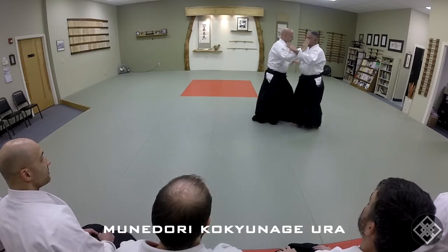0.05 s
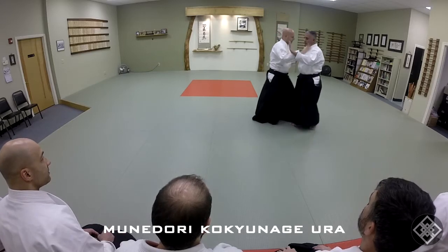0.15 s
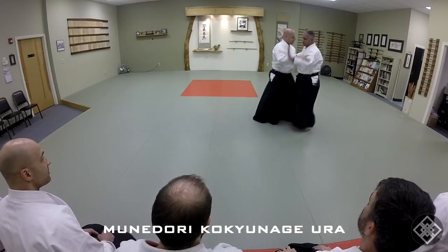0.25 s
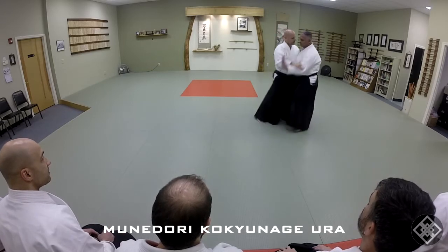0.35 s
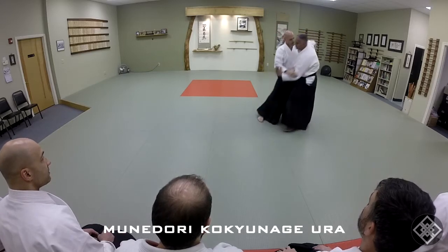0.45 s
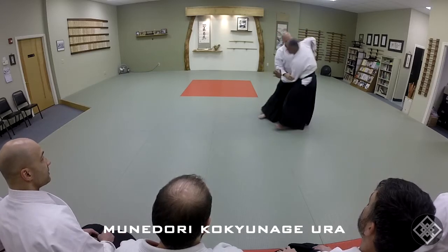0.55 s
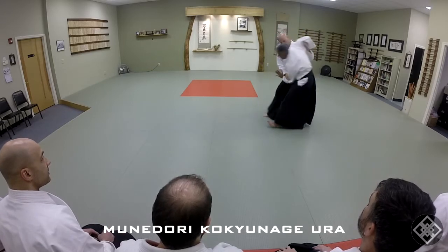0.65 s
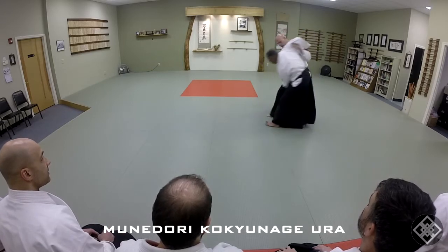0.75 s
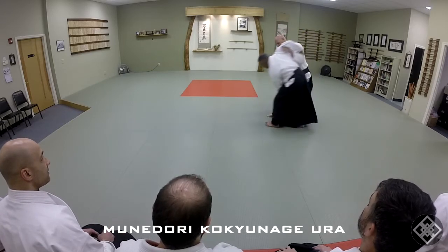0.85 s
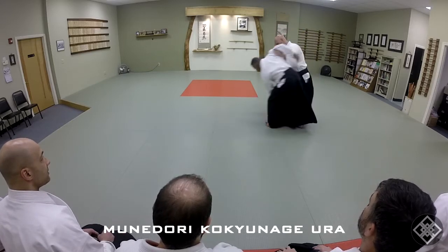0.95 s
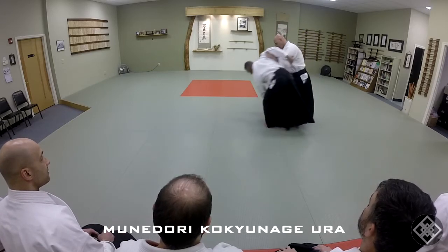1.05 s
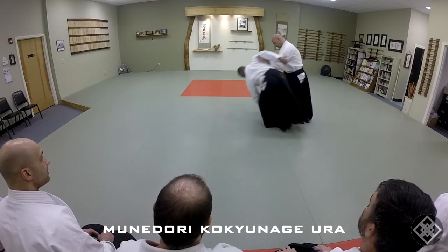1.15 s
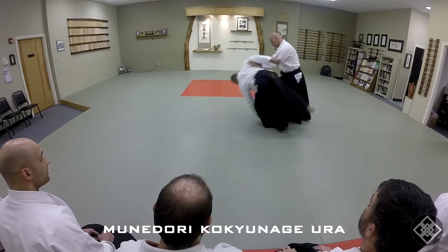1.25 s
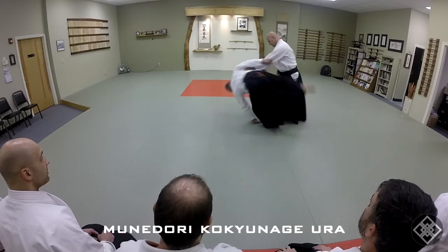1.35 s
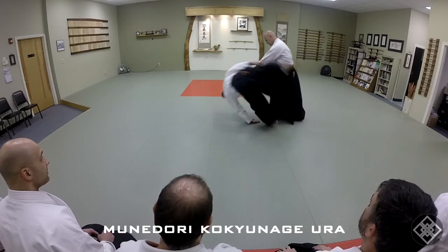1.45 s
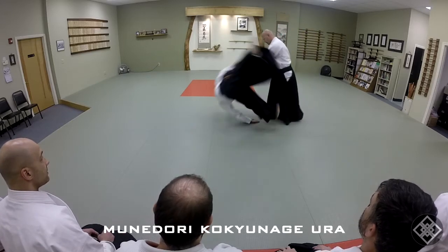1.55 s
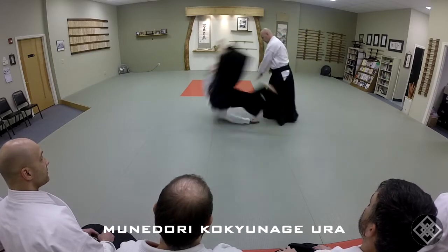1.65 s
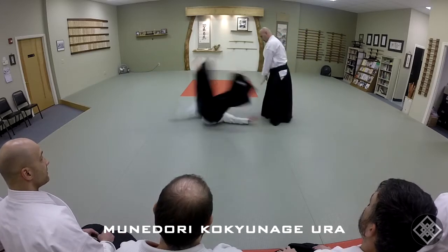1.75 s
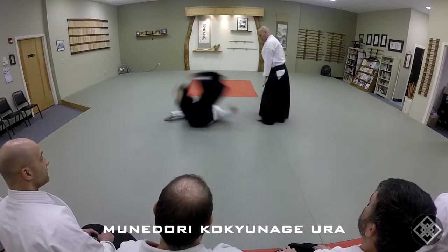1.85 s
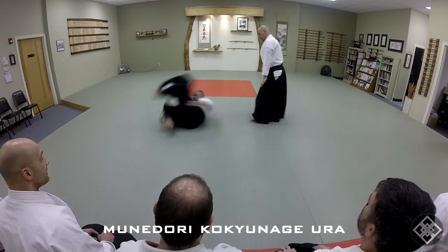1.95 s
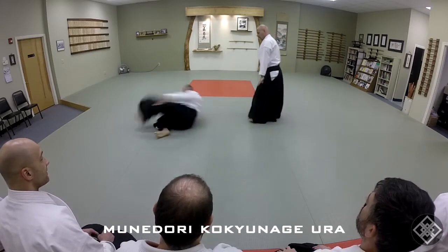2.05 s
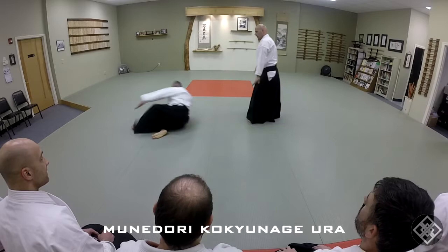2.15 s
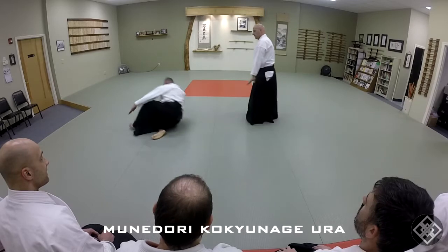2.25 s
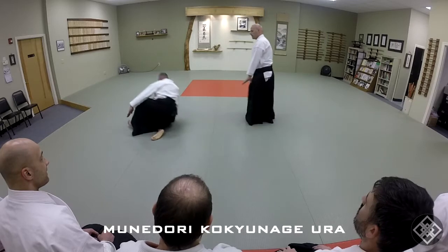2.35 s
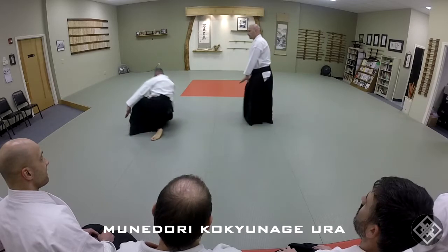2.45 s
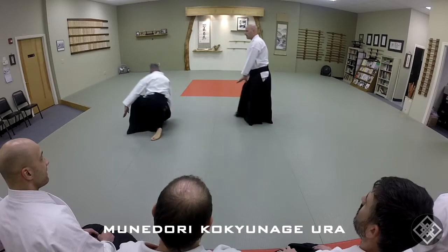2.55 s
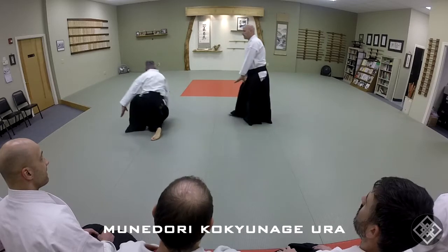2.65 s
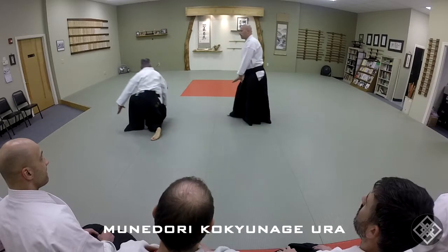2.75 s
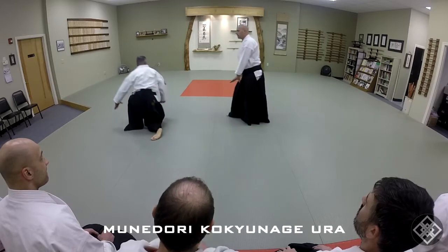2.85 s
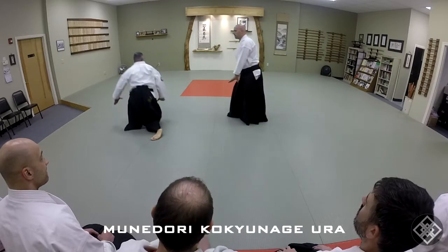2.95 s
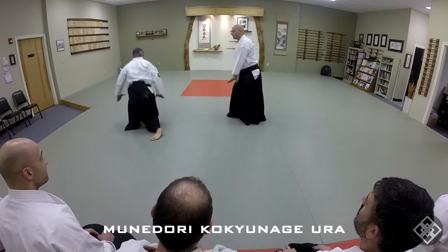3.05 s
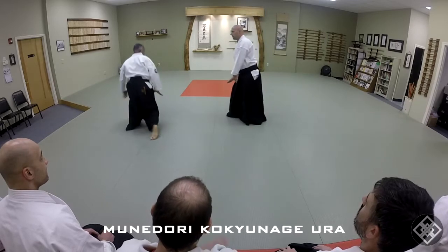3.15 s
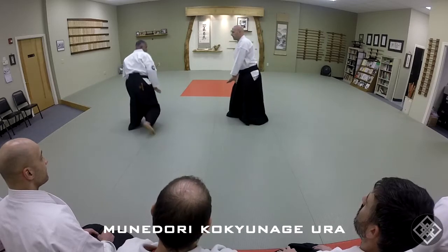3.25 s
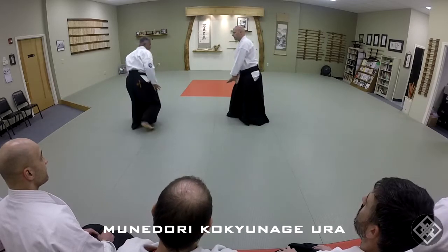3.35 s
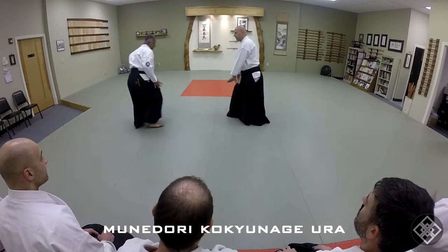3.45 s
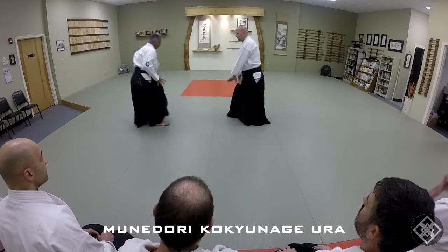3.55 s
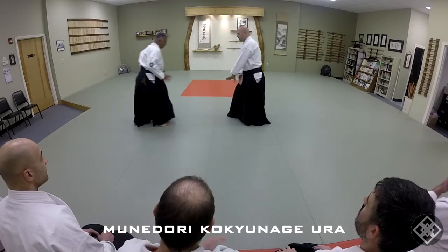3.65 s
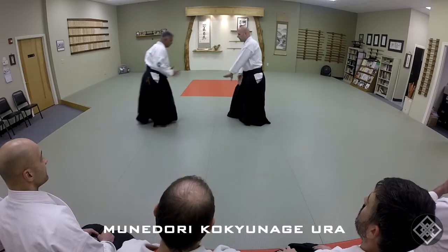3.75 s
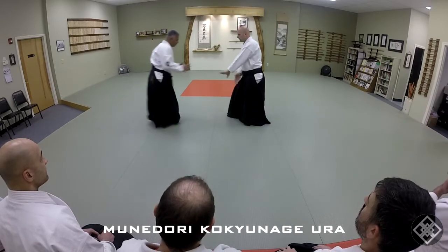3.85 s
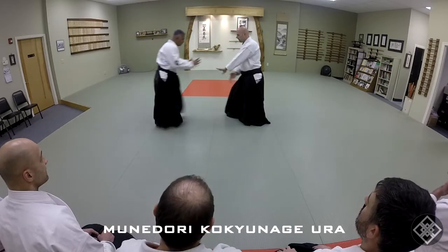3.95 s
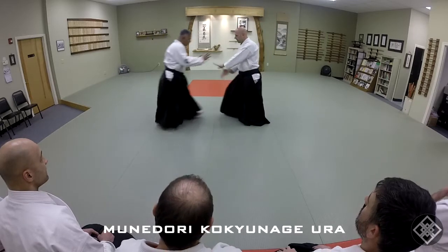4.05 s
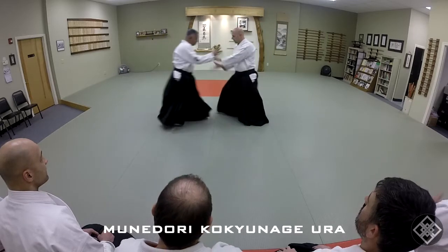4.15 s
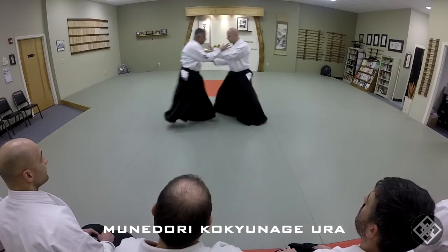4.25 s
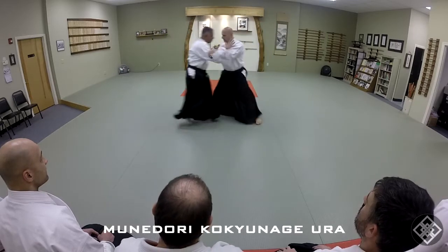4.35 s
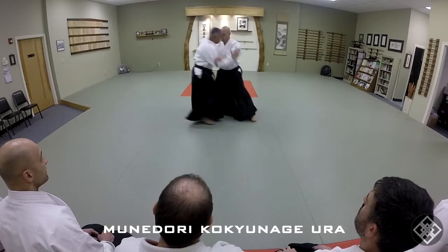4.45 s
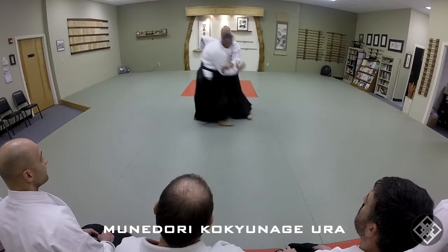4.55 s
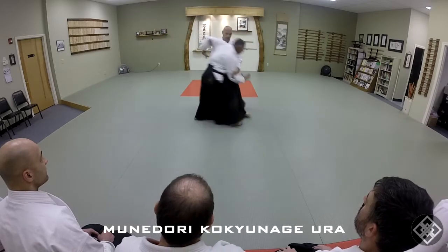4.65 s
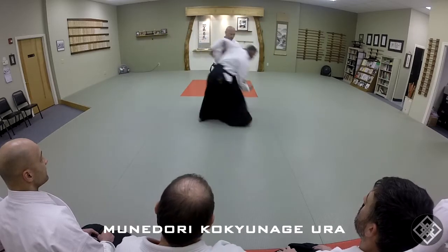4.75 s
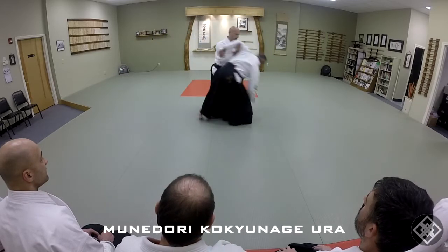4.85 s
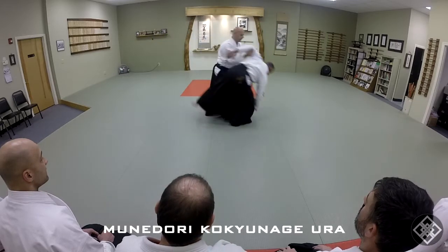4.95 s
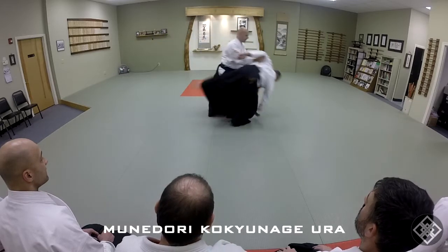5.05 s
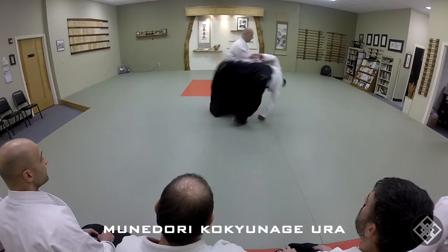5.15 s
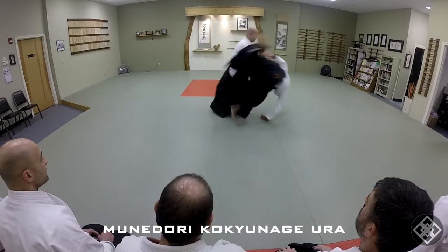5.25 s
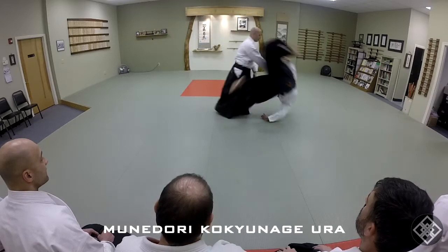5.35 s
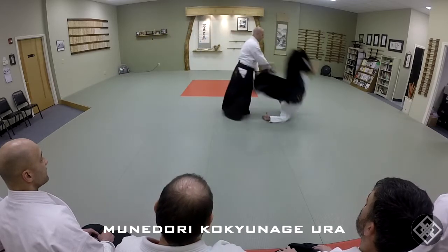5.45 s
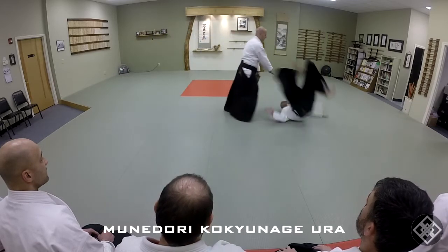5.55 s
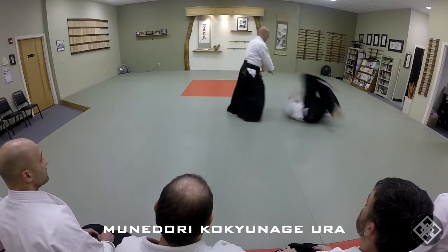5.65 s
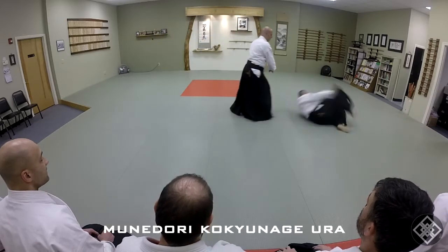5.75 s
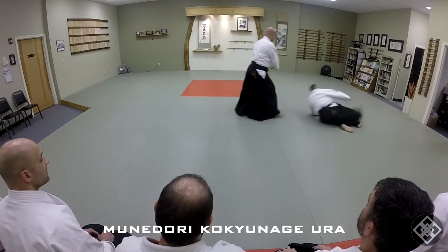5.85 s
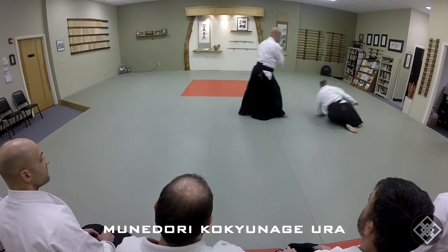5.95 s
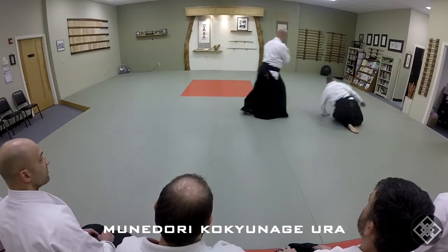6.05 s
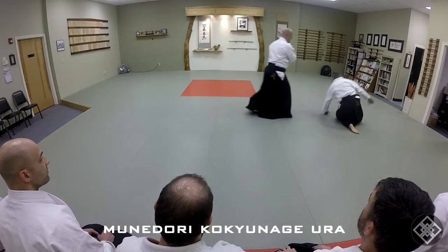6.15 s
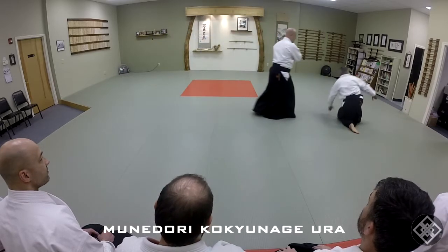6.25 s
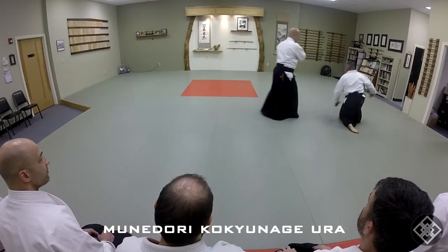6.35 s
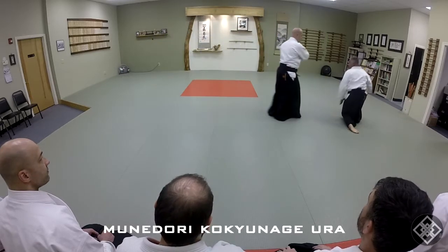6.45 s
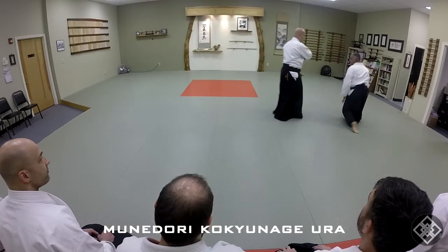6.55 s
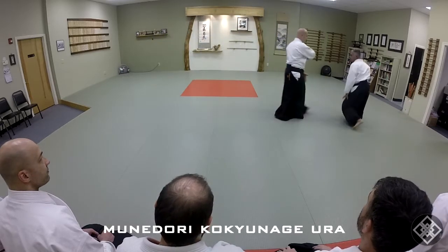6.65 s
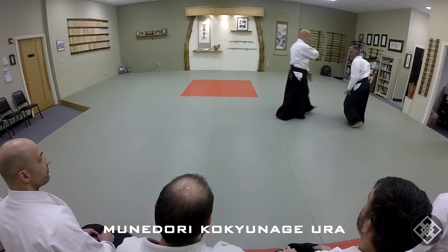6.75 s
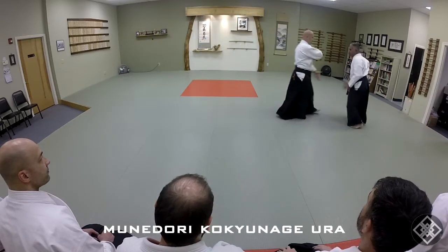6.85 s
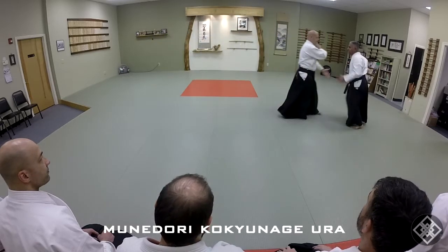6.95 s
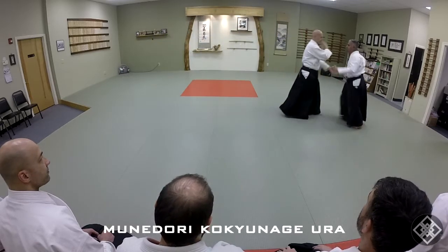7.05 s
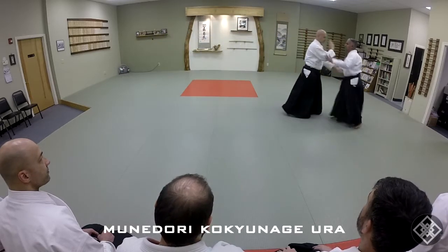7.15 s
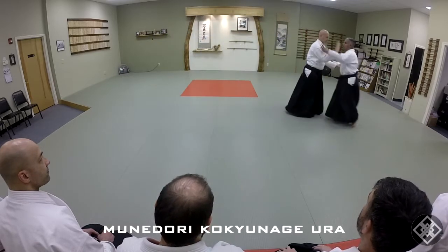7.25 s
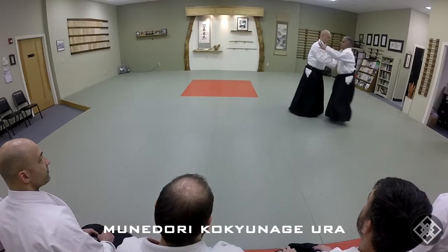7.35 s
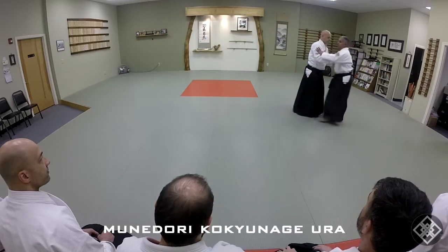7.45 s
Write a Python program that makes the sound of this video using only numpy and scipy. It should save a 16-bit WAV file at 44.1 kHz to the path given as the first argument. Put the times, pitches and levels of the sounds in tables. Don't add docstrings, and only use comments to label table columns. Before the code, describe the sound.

A quiet padded training hall with low ventilation hum. Bare feet scuff and heavy cloth rustles, then a body slams onto the mat with a sharp slap, a thud and a rolling floor rumble. Shuffling, cloth tugs and a light grip follow before a second, boomier fall. Small steps resume. A small camera microphone a few metres away overloads on the slaps and dips in level afterwards.

```python
import sys
import numpy as np
from scipy import signal
from scipy.io import wavfile

SR = 44100
rng = np.random.default_rng(int(sys.argv[2]) if len(sys.argv) > 2 else 0)


def log_audio(samples):
    frames = np.atleast_2d(samples).T
    limited = np.clip(frames, -1, 1)
    pcm = np.round(limited * 32767).astype(np.int16)
    wavfile.write(sys.argv[1], SR, pcm)


def gain_from_db(level_db):
    decades = np.asarray(level_db, float) / 20
    return 10 ** decades


N = 330249

BAND_EDGES = 22 * 2 ** np.arange(0, 10, .5)
# (frequency [Hz], width [Hz], level [dB])
FLOOR_MODES = [
    [(33.7, 10, -1), (61.7, 7, -4), (88.7, 18, -2), (129.7, 9.5, -2)],
    [(35.9, 7.4, -9), (80, 6.7, 2), (104.4, 13.5, -2), (134.3, 13, -4)],
]


def rms_one(x):
    return x / np.sqrt(np.mean(x ** 2) + 1e-20)


def at_hz(points, hz):
    table_hz, value = np.transpose(points)
    return np.interp(np.log(hz), np.log(table_hz), value)


def band(x, low_hz, high_hz):
    edges_hz = [low_hz, min(high_hz, .45 * SR)]
    return signal.sosfilt(signal.butter(2, edges_hz, "band", fs=SR, output="sos"), x)


def drift(rate_hz):
    r = np.exp(-80 * np.pi * rate_hz / SR)
    slow = signal.lfilter([1], [1, -2 * r, r * r], rng.standard_normal(N // 40 + 2002))
    slow = rms_one(slow[2000:])
    return np.interp(np.arange(N) / 40, np.arange(len(slow)), slow)


def resonate(x, modes):
    out = 0
    for k, (hz, width_hz, db) in enumerate(modes):
        r = np.exp(-np.pi * width_hz / SR)
        poles = [1, -2 * r * np.cos(2 * np.pi * hz / SR), r * r]
        ringing = signal.lfilter([1, 0, -1], poles, x) * np.sqrt(1 - r * r)
        out = out + (-1) ** k * gain_from_db(db) * ringing
    return out


def coloured(white, spectrum, patchy_db):
    out = 0
    for k, (low, high) in enumerate(zip(BAND_EDGES, BAND_EDGES[1:])):
        level_db = at_hz(spectrum, np.sqrt(low * high))
        if level_db > -60:
            flicker = 1 + patchy_db / 11.0 * drift(12.0)
            out = out + gain_from_db(level_db) * flicker * band(white[k % 2], low, high)
    return rms_one(out)


def grains(per_s, uneven_db):
    born = rng.random((2, N)) < per_s / SR
    size = gain_from_db(uneven_db * np.minimum(rng.exponential(1, (2, N)), 4))
    return born * size * rng.choice([-1, 1], (2, N)) + 1e-18


def swells(s, db, fade_s, least_rise_s, rise_share, rest_db=-90):
    t = np.arange(0, N + 32, 32)[:, None] / SR - s
    rise_s = least_rise_s + rise_share * fade_s
    power = gain_from_db(db - 20 * np.maximum(t / fade_s, -t / rise_s)) ** 2
    gain = np.sqrt(power.sum(axis=1) + gain_from_db(rest_db) ** 2)
    return np.interp(np.arange(N) / 32, np.arange(len(t)), gain)


def ventilation():
    # (frequency [Hz], density [dB per Hz])
    air_spectrum = [(12, -33), (20, 0.5), (60, 0), (285, -6), (377, -4.5), (542, -8), (718, -8.5),
                    (1760, -22), (7110, -35.5), (13200, -50.5), (14700, -26), (16000, -80)]
    # (time [s], level [dB])
    hum_levels = [(0.0, -34), (0.6, -43), (0.98, -68), (1.31, -54), (1.48, -33.5), (1.85, -42), (2.08, -17),
                  (2.75, -47), (3.54, -35.5), (4.38, -42), (4.61, -56), (4.88, -37.5), (5.55, -36.5),
                  (5.82, -18), (6.53, -42), (7.03, -35.5), (7.49, -34)]
    air = gain_from_db(-34.5) * coloured(rng.standard_normal((2, N)), air_spectrum, patchy_db=1.43)
    hum = np.sin(2 * np.pi * np.cumsum(57.5 + 1.5 * drift(2.46)) / SR)
    s, db = np.transpose(hum_levels)
    return air + gain_from_db(np.interp(np.arange(N) / SR, s, db) + 0.5) * hum


def sliding():
    # (frequency [Hz], density [dB per Hz])
    scuff_spectrum = [(700, -70), (1500, -6.5), (1800, -7), (2700, -7), (4900, -11), (6400, -12.5),
                      (10000, -45), (14000, -70)]
    # (time [s], scuff [dB], fade [s], swish above scuff [dB])
    footwork = [(.05, -46, 0.23, -10), (.36, -52, 0.28, -8), (.546, -49.5, 0.17, -5),
                (.758, -41.5, 0.43, -8), (1.12, -62, .1, 7), (1.26, -50, 0.28, -5),
                (1.45, -39.5, 0.73, -10), (2.632, -46, 0.18, 0), (3.272, -42, 0.14, -3),
                (3.34, -24, 0.1, -9), (3.45, -43, 0.31, -18), (3.59, -39.5, 0.16, -5),
                (4.06, -42.5, 0.45, -3), (4.33, -39, 0.17, -13), (4.41, -42.5, 0.63, -11),
                (4.72, -44.5, 0.44, -4), (5.3, -41.5, 0.33, -8), (6.342, -49.5, .8, -4.5),
                (6.674, -39, 0.17, -11), (6.72, -28.5, .07, -19), (6.78, -44, .4, -9),
                (7.062, -46.5, 0.35, -18), (7.2, -38, 0.2, -8), (7.408, -39.5, 0.15, -12)]
    # (time [s], scuff [dB], fade [s], swish above scuff [dB])
    tumbles = [(1.78, -38, 0.41, -22), (1.838, -35, .05, -20), (1.9, -21, .1, -3), (1.934, -19.5, 0.4, -16),
               (2.098, -25.5, 0.081, -13), (2.18, -43, 0.18, -25), (2.212, -23, .03, -20),
               (2.23, -26.5, 0.15, -8), (5.62, -34, 0.028, -16), (5.71, -16, 0.05, -18),
               (5.73, -22.5, 0.38, -15), (5.828, -22.5, 0.067, -22), (5.922, -21, .12, -15)]
    # (time [s], level [dB], fade [s])
    drags = [(.05, -45, 0.1), (.366, -40, 0.13), (1.26, -38, 0.11), (1.45, -36, 0.4), (1.78, -28.5, 0.4),
             (1.84, -23, .1), (1.89, -5.5, .03), (2.06, -37, 0.22), (2.098, -21.5, 0.14),
             (2.212, -23.5, 0.084), (2.25, -22, .12), (2.844, -42, .1), (3.272, -35, 0.16),
             (3.72, -41, .15), (4.04, -33.5, 0.25), (4.34, -30.5, .2), (4.4, -31.5, 0.32),
             (4.84, -35, 0.29), (5.41, -36, 0.3), (5.58, -25.5, 0.35), (5.71, -23, .03),
             (5.828, -11.5, 0.087), (5.922, -17, 0.14), (5.985, -24, 0.18), (6.342, -41, 0.49),
             (6.72, -40, .05), (6.98, -51, 0.099), (7.21, -32.5, 0.13), (7.408, -26.5, .07)]
    scuff = coloured(grains(6000, uneven_db=2.0), scuff_spectrum, patchy_db=-2.0)
    fine, coarse = grains(9000, uneven_db=-1.5)
    swish, drag = rms_one(band(fine, 3400, 15700)), rms_one(band(coarse, 375, 1600))
    out = gain_from_db(-7.5) * swells(*np.transpose(drags), .015, 0.31, rest_db=-46) * drag
    out = out + gain_from_db(-64) * scuff + gain_from_db(-86) * swish
    for motions, least_rise_s, rise_share in [(footwork, .015, 0.28), (tumbles, 0.011, .1)]:
        s, db, fade_s, swish_db = np.transpose(motions)
        out = out + gain_from_db(-6.0) * swells(s, db, fade_s, least_rise_s, rise_share) * scuff
        out = out + gain_from_db(-6.5) * swells(s, db + swish_db, fade_s, least_rise_s, rise_share) * swish
    return gain_from_db(1.53 * drift(18.0)) * out


def rolling():
    # (frequency [Hz], width [Hz], level [dB])
    mat_modes = [(148.4, 24, -2.5), (238, 28, -12), (321.8, 19, 1), (390, 73, -1), (474, 50, -3),
                 (673, 140, -5.5)]
    # (time [s], boards [dB], fade [s], foam above boards [dB])
    shifts = [(1.782, -13, .07, -11), (1.835, -19, .1, -9), (1.871, -3, 0.24, 1), (1.96, -5, 0.19, -7),
              (2.07, -10.5, 0.3, -7.5), (2.208, -9, 0.19, -10.5), (2.42, -25.5, .3, -20),
              (5.55, -30, 0.17, 4.5), (5.59, -18.5, 0.12, -0.5), (5.663, 4, 0.12, -8),
              (5.686, 8, 0.091, -11.5), (5.765, 0, 0.067, -22), (5.79, -17.5, 0.21, 4.5),
              (5.83, -6.5, .1, -8), (5.87, -1.5, 0.12, -15), (5.92, -3.5, .15, -14.5),
              (5.96, -2.5, .2, -17), (6.254, -32, .3, -13), (6.44, -30, .05, -7)]
    shaking = rng.standard_normal(N)
    foam = rms_one(resonate(rng.standard_normal(N), mat_modes))
    first, second = (rms_one(resonate(shaking, modes)) for modes in FLOOR_MODES)
    boards = np.where(np.arange(N) < N / 2, first, second)
    s, db, fade_s, foam_db = np.transpose(shifts)
    out = gain_from_db(-4.5) * swells(s, db, fade_s, .008, .03) * boards
    return out + gain_from_db(-1.0) * swells(s, db + foam_db, fade_s, .008, .03) * foam


def ticks():
    # (time [s], peak [dB], centre [Hz], length [ms])
    short_bursts = [(1.769, -15, 800, 0.63), (1.7687, -19.5, 2760, 0.95), (1.837, -19, 4900, 1.2),
                    (1.864, -8.5, 3000, 5.6), (1.872, -12, 6950, 2.5), (1.8878, -5, 2600, 4.1),
                    (1.889, -11, 7500, 2), (1.905, -13.5, 8000, 3), (1.916, -10, 2200, 4),
                    (2.092, -32, 3000, 10), (2.2073, -8, 4900, 1.4), (2.2086, -13, 11000, .8),
                    (2.215, -17, 6500, 0.92), (2.238, -16, 3480, 1), (5.46, -31, 1180, 1.1),
                    (5.562, -31, 5460, 0.9), (5.613, -39, 9000, 1), (5.6395, -12, 690, 1.4),
                    (5.641, -36, 6000, 0.75), (5.659, -3.5, 3240, 7.9), (5.66, -16, 12500, 12),
                    (5.667, -6, 3600, 12), (5.681, -5, 2950, 6.7), (5.826, -17, 6960, 1.1),
                    (5.899, -23, 1000, 2), (5.917, -13.5, 6960, 1.2), (5.925, -15.5, 1990, 8.6),
                    (5.985, -19, 1200, 8),
                    (0.049, -36, 4000, 2), (3.278, -23.5, 4900, 16), (3.3, -30, 5000, 11),
                  (3.336, -21, 3180, 8.1), (3.357, -22, 3000, 11), (3.372, -22.5, 5100, 8),
                  (4.199, -30, 5460, 1.5), (4.1995, -27.5, 3000, 1.5), (4.332, -23.5, 585, 11),
                  (4.407, -16, 610, 15), (4.408, -28, 5000, 2.5), (4.411, -17, 1060, 14),
                  (6.673, -31, 5450, 11), (6.7, -32.5, 7000, 6), (7.206, -29, 6800, 5.8),
                  (7.234, -29, 6000, 1), (7.242, -34, 8000, 1), (7.266, -36, 7000, 1)]
    out, t = np.zeros(N), np.arange(2048) / SR
    for s, db, hz, length_ms in short_bursts:
        burst = rng.standard_normal(len(t)) * np.exp(-1000 * t / length_ms)
        burst[0] += 4
        snap = band(burst, hz / 1.35, hz * 1.35)
        at = round(s * SR)
        out[at:at + len(t)] += gain_from_db(db) * snap / np.abs(snap).max()
    return out


def blows():
    # (time [s], thud [dB], boom [dB], slap [dB])
    landings = [(1.7704, -19, -42, -44), (1.781, -6, -17.5, -27), (1.8641, 4.5, -4, 3.5),
                (1.872, 5, -3, -6), (1.889, 4, -8.5, -19), (1.915, 3, -4.5, -20), (1.955, -0.5, -25, -17),
                (2.015, -9, -8, -32), (2.2076, -5.5, -22, -21), (2.238, -14, -19, -28),
                (4.4071, -20, -35, -40), (5.59, -20, -30, -40), (5.6395, -12, -29, -29),
                (5.6536, -13, -22, -14), (5.659, 6, 0.5, 0.5), (5.666, 2, 3.5, 1.5), (5.682, -14, 2.5, -15),
                (5.703, -14, 0.5, -20), (5.723, -19, -3, -25), (5.761, -6.5, -2.5, -14),
                (5.818, -7, 0.5, -14), (5.916, -2.5, -16.5, -17), (5.986, -24, -12.5, -15.5),
                (7.404, -22.5, -37, -35)]
    # (low edge [Hz], high edge [Hz])
    blow_bands = [
        (231, 1055),
        (64.4, 363),
        (507, 1680),
        (1550, 8600),
    ]
    contact_s = (.002, .005, .002, .0004)
    out, t = np.zeros(N), np.arange(12000) / SR
    for s, thud_db, boom_db, slap_db in landings:
        ragged = 1 + 0.75 * rng.standard_normal(len(t))
        parts = []
        for (low, high), lasting_s in zip(blow_bands, contact_s):
            push = ragged * t * np.exp(-t / lasting_s) + 1e-18
            parts.append(band(band(push, low, high), low / 1.1, high * 1.15))
        parts.append(resonate(parts[1], FLOOR_MODES[int(s > N / SR / 2)]))
        crack_db = 1.2 * slap_db - 5.5
        at = round(s * SR)
        for db, part in zip([thud_db, boom_db, slap_db, crack_db, boom_db + 0.5], parts):
            out[at:at + len(t)] += (gain_from_db(db) * part / np.abs(part).max())[:N - at]
    return out


def hall(x):
    # (frequency [Hz], time to fall 60 dB [s])
    decay = [(45, 1), (110, 1), (280, 0.71), (740, 0.56), (1940, 0.37), (5120, 0.47), (13500, 0.12)]
    # (frequency [Hz], level [dB])
    share = [(130, -33.5), (210, -30), (330, -31.5), (500, -26.5), (750, -33), (1500, -29.5), (5000, -29),
             (14000, -24.5)]
    t = np.arange(SR) / SR
    white, tail = rng.standard_normal((2, len(t))), 0
    for k, (low, high) in enumerate(zip(BAND_EDGES[5:], BAND_EDGES[6:])):
        hz = np.sqrt(low * high)
        dying = gain_from_db(at_hz(share, hz) - 60 * t / at_hz(decay, hz))
        tail = tail + band(white[k % 2], low, high) * dying
    build_up = 1 - np.exp(-t / .008)
    return signal.fftconvolve(x, tail * build_up)[:N]


def scene():
    heavy, small = blows(), ticks()
    struck = heavy + small + hall(heavy + gain_from_db(-9) * small)
    return (ventilation() + sliding() + rolling() + struck)[None]


def gain_db():
    # (time [s], depth [dB], hold [s])
    ducks = [
        (1.864, 7.5, 0.38),
        (5.663, 4.5, 0.22),
    ]
    duck_s, recover_s = 0.15, 0.49
    t, gain = np.arange(N) / SR, 0.09
    for s, depth_db, hold_s in ducks:
        corners_s = np.cumsum([0, duck_s, hold_s, recover_s])
        gain = gain - depth_db * np.interp(t - s, corners_s, [0, 1, 1, 0])
    return gain


def roll_off(x):
    return signal.sosfilt(signal.butter(12, 16420, fs=SR, output="sos"), x)


def record(dry):
    top_cut = signal.cheby2(12, 45, 15700, fs=SR, output="sos")
    levelled = signal.sosfilt(top_cut, dry) * gain_from_db(gain_db())
    return roll_off(np.clip(levelled, -.99, .99))


dry = scene()
out = record(dry)
log_audio(out)
```